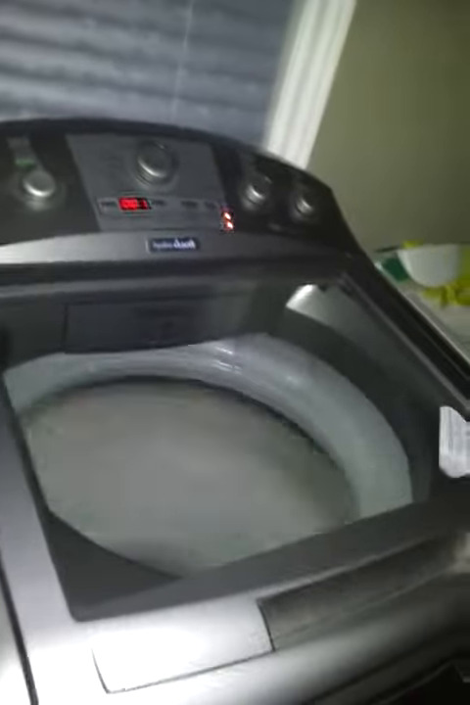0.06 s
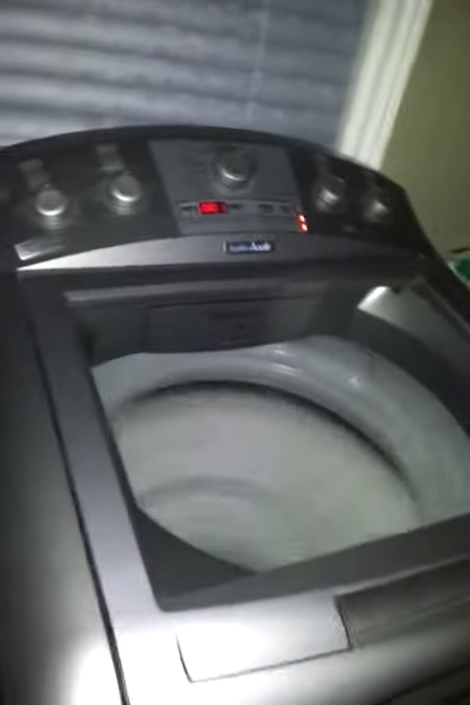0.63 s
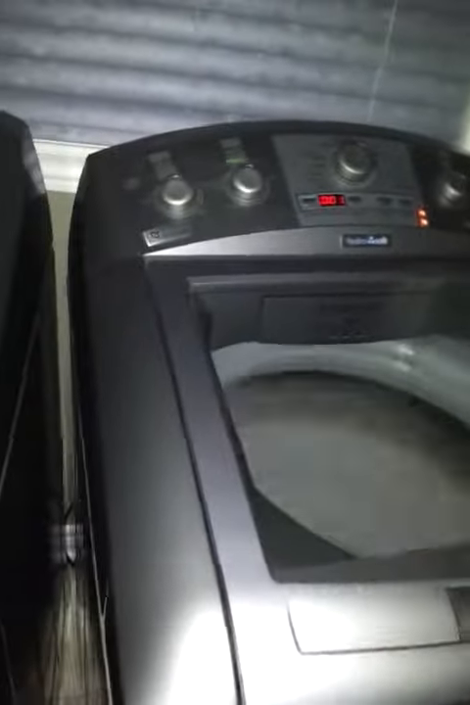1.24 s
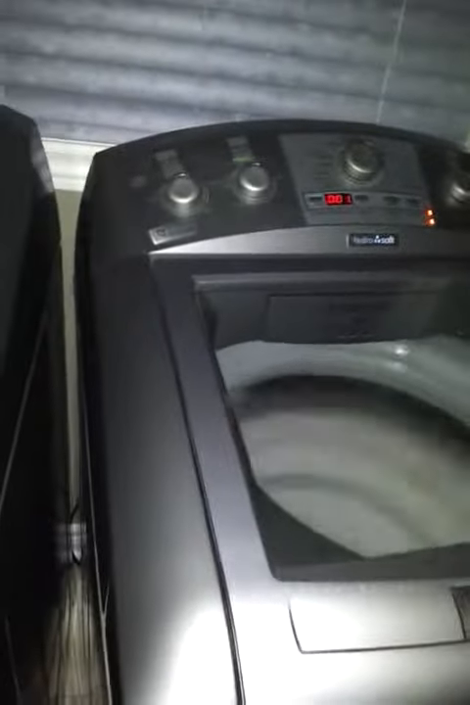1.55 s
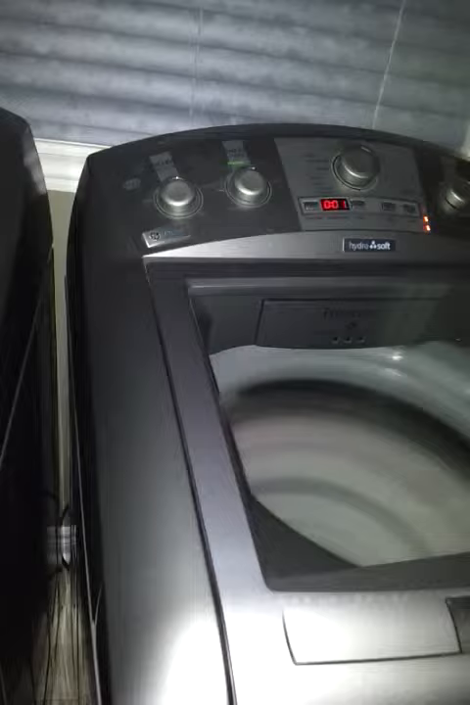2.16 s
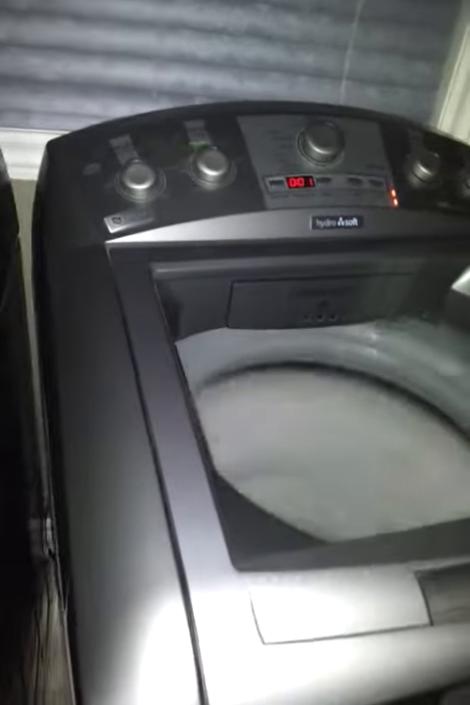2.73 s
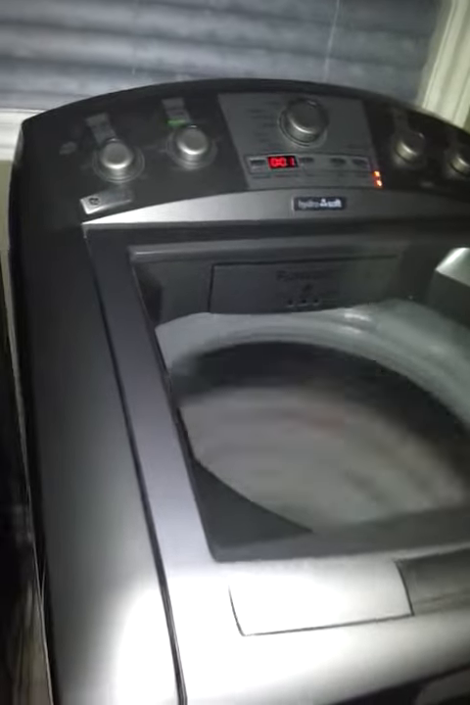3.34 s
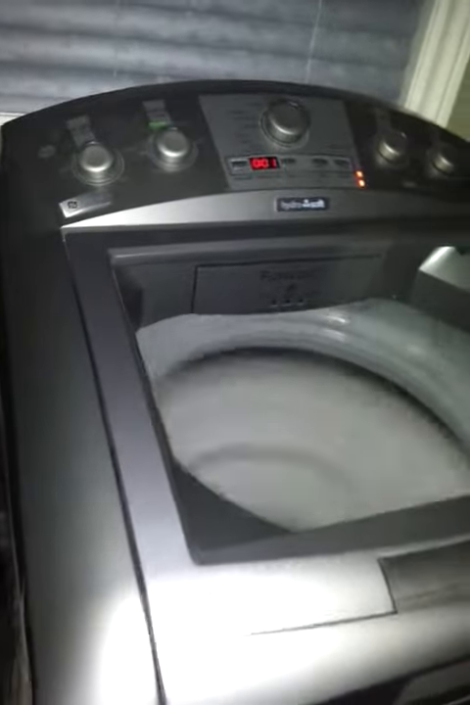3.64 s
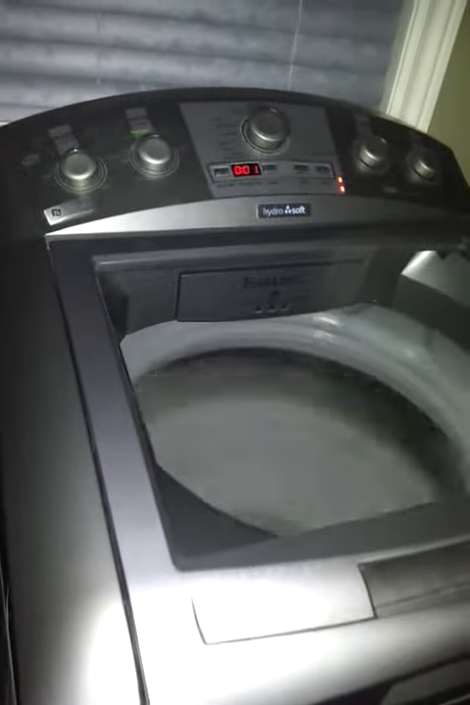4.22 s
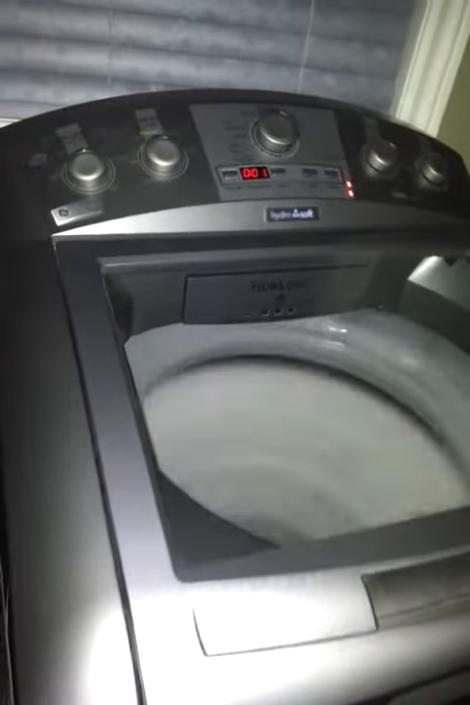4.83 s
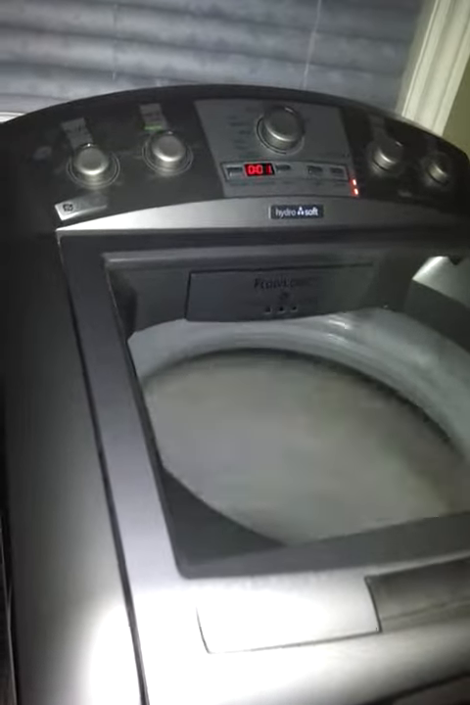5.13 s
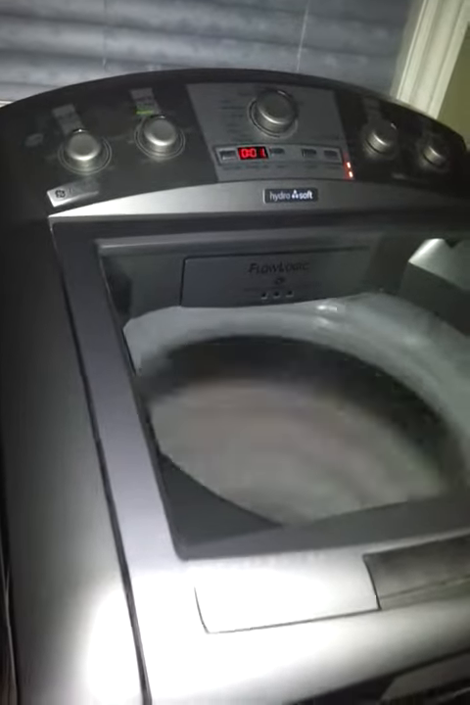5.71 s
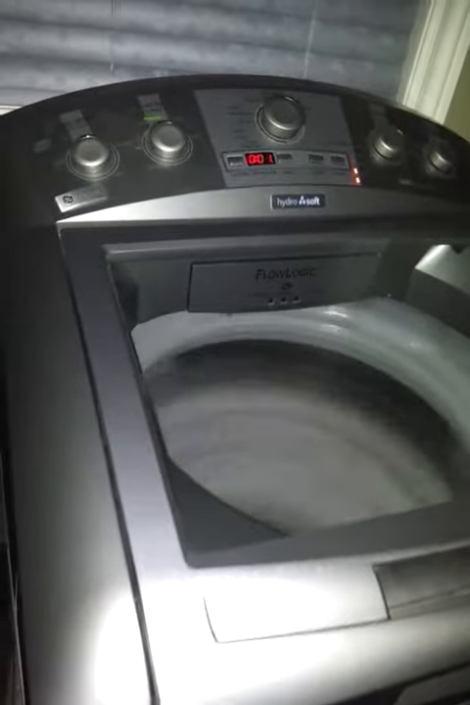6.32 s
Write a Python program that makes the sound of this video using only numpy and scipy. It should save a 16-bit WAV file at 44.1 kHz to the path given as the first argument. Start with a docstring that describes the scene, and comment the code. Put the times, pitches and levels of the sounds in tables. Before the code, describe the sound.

A top-loading washing machine spins out of balance in a small room, loud and close from the first moment to the end at about 6.5 seconds. On every turn, about eleven times a second, a loose metal part gives a bright, ringing clatter, the tub knocks along the steel cabinet with a hard buzz, and the suspension adds a low thump. These blend into one fast, even, continuous rattling knock whose speed and loudness barely change. Underneath run the steady rush of the drum and a faint, slowly swelling motor hum. A low, irregular rumble is present at the start and dies away by about 2 seconds as the load settles. The microphone begins in front, moves to the side from roughly 0.8 to 1.4 seconds and is back by 4 seconds, slightly changing the clatter's tone. The machine is still rattling at the end.

```python
"""A top-loading washing machine spins out of balance, about eleven turns a second, in a small room.
One microphone stands close in front, moves to the left side and is back by 4 s. On every turn a loose
metal part clatters, the tub knocks along the steel cabinet and the suspension thumps. Underneath, the
drum rushes and the motor hums; a low rumble dies away in the first two seconds as the load settles."""
import sys
import numpy as np
from scipy import signal
from scipy.fft import rfft, irfft, next_fast_len
from scipy.io import wavfile
from scipy.ndimage import uniform_filter1d

SR = 44100
rng = np.random.default_rng(int(sys.argv[2]) if len(sys.argv) > 2 else 0)


def wav_record(signal):
    """Record a signal, one row per channel, as 16-bit PCM in the file named by sys.argv[1]."""
    frames = np.transpose(np.atleast_2d(signal))
    bounded = np.clip(frames, -1, 1)
    # unit amplitude maps onto the largest positive 16-bit level
    quanta = np.round(bounded * 32767).astype(np.int16)
    wavfile.write(sys.argv[1], SR, quanta)


N = 285327
LEAD = SR // 2   # the machine is already running when we come in
TIME = np.arange(-LEAD, N) / SR
SIZE = len(TIME)
PADDED = next_fast_len(SIZE + SR // 2, True)
HZ = np.maximum(np.fft.rfftfreq(PADDED, 1 / SR), 1)

# mean speed of the drum: time_s, turns_per_s
DRUM_SPEED = [(0, 11.02), (.8, 11.048), (1.5, 11.02), (2.4, 11.015), (3.7, 11.046), (4.5, 11.006),
              (6.47, 11.006)]
# force of the imbalance behind every contact: time_s, level_db
IMBALANCE = [(0, -0.3), (.7, 0.2), (1.25, -0.65), (1.8, 0), (2.35, -.5), (3.1, .5), (3.65, -0.3),
             (4.05, 0.4), (6.47, 0)]
# resonances of the steel panels and lid: pitch_hz, width_hz, boost_db
PANEL_MODES = [(358, 22, 3), (418.3, 59, 6.5), (490.7, 20, 9), (598.5, 51, 7.5), (715.7, 41, 7),
               (835, 56, 7), (850, 54, -0.5), (964, 29, 5.5), (995.5, 36, 5), (1036, 47, 6.5),
               (1100, 52, 2), (1447, 120, 6), (1587, 36, 3), (1782, 38, 7.5), (1914, 22, 4.5),
               (2063, 36, 4), (2184, 38, 2.5), (2254, 20, 2), (2490, 48, 2.5), (2670, 180, 4.5),
               (3234, 110, 3), (3660, 100, 0.5), (3790, 64, 3), (4050, 21, -3.5), (4307, 44, 3),
               (4240, 64, -1.5), (4870, 27, 2.5), (5070, 29, 5.5), (5620, 160, 5), (6160, 310, 5.5)]
# tone of the clatter before the panels colour it: frequency_hz, level_db
CLATTER_SPECTRUM = [(300, -22), (900, -18), (1400, -12.5), (2000, -5.5), (3000, -2), (4000, -0.5),
                    (5000, 0), (6000, -3.5), (6600, -8), (7100, -13), (7600, -29.5)]
# long-ringing modes of the loose part: pitch_hz, relative_db
METAL_MODES = [(1631, -40.5), (1760, -44), (1922, -45.5), (2056, -44), (2094, -42), (2175, -41),
               (2256, -42.5), (2519, -50.5), (2713, -47.5), (2907, -44.5), (3305, -38.5), (3612, -45),
               (3763, -45.5), (3994, -35), (4091, -43.5), (4247, -44), (4457, -38.5), (4990, -41.5),
               (5125, -42), (5227, -44.5), (6137, -45), (6282, -48)]
# clatter bands that nearby walls lift or cancel: centre_hz, width_hz, front_db, left_db
WALL_REFLECTIONS = [(3660, 350, -.5, 1.5), (3895, 290, -3, -0.5), (4510, 320, 2.5, 0.5),
                    (6300, 573, -1.5, -3)]
# the microphone's path: time_s, position (0 in front, 1 at the left)
MIC_PATH = [(.8, 0), (1.4, 0.84), (2.4, 0.8), (3.9, 0)]
# hard knocks of the tub within a turn: place_turns, level_db
TUB_KNOCKS = [(.11, -1.5), (.18, 1), (0.228, 0.5), (.29, -3.5), (0.3578, 0.5), (0.4009, 1.5), (.46, -0.5),
              (0.5627, -2), (0.6211, 3), (.77, -1.5), (0.9361, -0.5)]
# tone of the knocks before the panels colour it: frequency_hz, level_db
KNOCK_SPECTRUM = [(120, -25), (220, -13), (310, 1), (460, -2.5), (680, -2.5), (900, -4.5), (1200, -3.5),
                  (1800, -9), (3000, -15.5), (5000, -21), (7500, -38)]
# thumps of the suspension within a turn: place_turns, level_db
SUSPENSION_THUMPS = [(.735, 0.5), (0.145, -12.5), (.455, -12.5)]
# low modes of tub and cabinet: pitch_hz, level_db, t60_s
BOOM_MODES = [(38.3, -23.5, 0.17), (56.6, -26, 0.17), (95, -30, 0.2), (136.8, -25.5, 0.51),
              (177.56, -26, 0.89), (206.3, -21.5, 0.43)]
# tone of the drum's rush before the panels colour it: frequency_hz, level_db
RUSH_SPECTRUM = [(20, -23.5), (60, -12.5), (82, -8), (100, 3.5), (135, 7), (160, -1.5), (220, 5),
                 (330, 2.5), (600, -7), (1200, -4.5), (2200, -9.5), (5000, -3.5), (6200, -25), (7500, -32)]
# tone of the load's rumble before the panels colour it: frequency_hz, level_db
RUMBLE_SPECTRUM = [(120, -27), (260, 0), (350, 4), (480, -9.5), (800, -11.5), (1300, -18.5), (3000, -33)]
# partials of the motor: pitch_hz, level_db, beat_depth_db, swell_share
HUM_PARTIALS = [(119.9, -37, 2, .1), (239.4, -31.5, 2.5, 0.97), (360, -39.5, 0.5, .3)]
# slow swell of the hum: time_s, level_db
MOTOR_SWELL = [(.2, -7), (.75, 2.5), (1.9, -2.5), (3.1, 0.5), (3.95, 0.5), (4.75, 1.5), (5.4, -2.5),
               (5.75, 3.5), (6.47, -8)]


def from_db(db):
    """Decibels to gain."""
    return 10 ** (np.asarray(db) / 20)


def rms_one(x):
    """Scale to unit rms."""
    return x / np.sqrt(np.mean(x ** 2) + 1e-20)


def in_time(rows):
    """A curve of time_s and value, read at every sample."""
    return np.interp(TIME, *np.transpose(rows))


def cabinet(x, spectrum):
    """A source heard through the panels: its own spectrum plus their resonances, at unit rms."""
    hz, db = np.transpose(spectrum)
    curve_db = np.interp(np.log(HZ), np.log(hz), db)
    for centre, width, boost_db in PANEL_MODES:
        curve_db = curve_db + boost_db / (1 + (2 * (HZ - centre) / width) ** 2)
    # minimum phase: the panels ring only after they are struck
    cepstrum = irfft(np.log(from_db(curve_db)), PADDED)
    cepstrum[1:PADDED // 2] *= 2
    cepstrum[PADDED // 2 + 1:] = 0
    return rms_one(irfft(rfft(x, PADDED) * np.exp(rfft(cepstrum)), PADDED)[:SIZE])


def drum_turns(start_turn=.203, sway_period_s=.51, sway_crest_s=.34, sway_decay_s=3.5):
    """Drum angle in turns; the tub sways on its springs, ever less, and the speed sways with it."""
    sway_depth = .09 * np.exp(-TIME / sway_decay_s)   # turns per second
    sway = sway_depth * np.cos(2 * np.pi * (TIME - sway_crest_s) / sway_period_s)
    turn = np.cumsum(in_time(DRUM_SPEED) + sway) / SR
    return turn - turn[LEAD] + start_turn


def strikes(turn, place, level_db, jitter_s, wander_s, uneven_db, after_s=0):
    """One click a turn, after_s past the given place, slightly uneven in timing and force."""
    turns = np.arange(np.ceil(turn[0]) - 1, np.floor(turn[-1]) + 1)
    jitter, wander, force = rng.standard_normal((len(turns), 3)).T
    wander = rms_one(uniform_filter1d(wander, size=21))
    at = np.interp(turns + place, turn, np.arange(SIZE), left=-SIZE, right=2 * SIZE)
    at = at + SR * (after_s + jitter_s * jitter + wander_s * wander)
    heard = (at >= 0) & (at < SIZE - 1)
    gain = from_db(level_db + uneven_db * force[heard])
    sample, late = at[heard].astype(int), at[heard] % 1   # each click is shared by two samples
    return np.bincount(sample, gain * (1 - late), SIZE) + np.bincount(sample + 1, gain * late, SIZE)


def struck_spot(crack_t60_s, ring_t60_s, ring_db, room_db, room_t60_s=.4):
    """One hit as it reaches the microphone: a crack, the dense ring of sheet steel, the room's tail."""
    t = np.arange(SR * 2 // 5) / SR
    power = 0
    for db, t60_s in (0, crack_t60_s), (ring_db, ring_t60_s), (room_db, room_t60_s):
        decay = rms_one(np.exp(-np.log(1000) * t / t60_s))
        power = power + (from_db(db) * decay) ** 2
    return rms_one(np.sqrt(power) * rng.standard_normal(len(t)))


def bounces(count=21, first_gap_s=.0023, rise_s=.0087, rise_db=4.5, fall_db_per_s=154.5):
    """The loose part's bounces swell quickly, then weaken as the gaps widen: delay_s, level_db."""
    gaps_s = first_gap_s * 1.05 ** np.arange(count)
    delay_s = np.cumsum(gaps_s) - gaps_s[0]
    onset_db = -rise_db * np.maximum(1 - delay_s / rise_s, 0)
    fall_db = fall_db_per_s * np.maximum(delay_s - rise_s, 0)
    return zip(delay_s, onset_db - fall_db)


def metal_ring(hits, width_hz=45, ring_db=1.5):
    """Every bounce wakes the same narrow modes, which sing on into the next turn."""
    top_db = max(db for _, db in METAL_MODES)
    out = hits
    for hz, db in METAL_MODES:
        mode = signal.lfilter(*signal.iirpeak(hz, hz / width_hz, fs=SR), hits)
        out = out + from_db(ring_db + db - top_db) * mode
    return out


def wall_colour(x):
    """Nearby walls strengthen or weaken a few bands, depending on where the microphone is."""
    leftward = in_time(MIC_PATH)
    for hz, width, front_db, left_db in WALL_REFLECTIONS:
        gain = from_db(front_db + leftward * (left_db - front_db))
        x = x + (gain - 1) * signal.lfilter(*signal.iirpeak(hz, hz / width, fs=SR), x)
    return x


def loose_part_clatter(turn, fling_turns=.09):
    """Flung up once a turn, the loose part bounces from spot to spot, nearly alike every time."""
    hits = 0
    for delay_s, db in bounces():
        clicks = strikes(turn, fling_turns, db, jitter_s=1e-5, wander_s=4e-5, uneven_db=.5,
                         after_s=delay_s)
        spot = struck_spot(crack_t60_s=.011, ring_t60_s=.04, ring_db=4.5, room_db=4)
        hits = hits + signal.oaconvolve(clicks, spot)[:SIZE]
    return wall_colour(cabinet(metal_ring(hits), CLATTER_SPECTRUM))


def tub_knocks(turn, tap_count=14, tap_db=-4.5):
    """Hard knocks and lighter taps meet the cabinet at the same places each turn, making a buzz."""
    tap_places = (np.arange(tap_count) + rng.random(tap_count)) / tap_count
    taps = [(place, tap_db) for place in tap_places]
    clicks = sum(strikes(turn, place, db, jitter_s=4e-5, wander_s=14e-5, uneven_db=.75)
                 for place, db in TUB_KNOCKS + taps)
    # bending waves disperse in the sheet steel: each knock is smeared in time but keeps its colour
    spread = rfft(struck_spot(crack_t60_s=.023, ring_t60_s=.11, ring_db=4, room_db=-5), PADDED)
    smeared = irfft(rfft(clicks, PADDED) * spread / np.abs(spread), PADDED)[:SIZE]
    return cabinet(smeared, KNOCK_SPECTRUM)


def suspension_thumps(turn):
    """The unbalanced load shoves the suspension and the low modes boom."""
    clicks = sum(strikes(turn, place, db, jitter_s=6.3e-5, wander_s=23e-5, uneven_db=1)
                 for place, db in SUSPENSION_THUMPS)
    boom = 0
    for hz, db, t60_s in BOOM_MODES:
        radius = np.exp(-np.log(1000) / (t60_s * SR))
        feedback = radius * np.cos(2 * np.pi * hz / SR)
        mode = signal.lfilter([1, -feedback], [1, -2 * feedback, radius ** 2], clicks + 1e-18)
        boom = boom + from_db(db) * mode
    soft_contact = signal.butter(2, [24, 330], "band", fs=SR, output="sos")
    return signal.sosfilt(soft_contact, boom)


def drum_rush(level_db=-24):
    """The steady rush of the spinning drum, heard through the cabinet."""
    return from_db(level_db) * cabinet(rng.standard_normal(SIZE), RUSH_SPECTRUM)


def load_rumble(level_db=-27.5, settled_s=2.24, fade_s=2):
    """An irregular rumble in the panels that fades as the load settles."""
    unsettled = np.clip((settled_s - TIME) / fade_s, 0, 1)
    return from_db(level_db) * np.sqrt(unsettled) * cabinet(rng.standard_normal(SIZE), RUMBLE_SPECTRUM)


def motor_hum(beat_period_s=.805, beat_crest_s=.73):
    """Magnetic hum near multiples of twice the mains frequency, beating and swelling slowly."""
    beat = np.cos(2 * np.pi * (TIME - beat_crest_s) / beat_period_s)
    swell_db = in_time(MOTOR_SWELL)
    hum = 0
    for hz, db, depth_db, share in HUM_PARTIALS:
        amplitude = np.sqrt(2) * from_db(db + share * swell_db + depth_db * beat)
        hum = hum + amplitude * np.sin(2 * np.pi * (hz * TIME + rng.random()))
    return hum


def scene():
    """The machine at the microphone: drum angle times every contact, the imbalance sets how hard."""
    turn = drum_turns()
    clatter = from_db(-18) * loose_part_clatter(turn)
    knocks = from_db(-21) * tub_knocks(turn)
    contacts = from_db(in_time(IMBALANCE)) * (clatter + knocks + suspension_thumps(turn))
    return (contacts + drum_rush() + load_rumble() + motor_hum())[None, LEAD:]


def record(dry, ceiling=1.0, cutoff_hz=7650):
    """The recorder rounds off the highest peaks and cuts the top treble."""
    rounded = dry / np.sqrt(np.hypot(1, (dry / ceiling) ** 2))
    lowpass = signal.ellip(8, .05, 45, cutoff_hz, fs=SR, output="sos")
    return signal.sosfiltfilt(lowpass, rounded)


dry = scene()
out = record(dry)
wav_record(out)
```